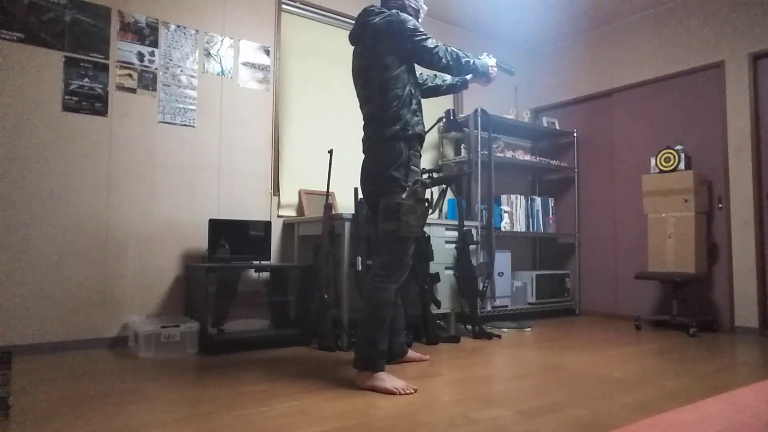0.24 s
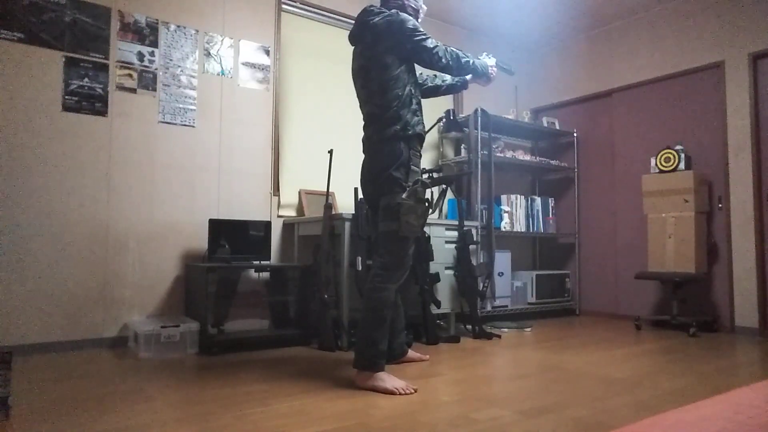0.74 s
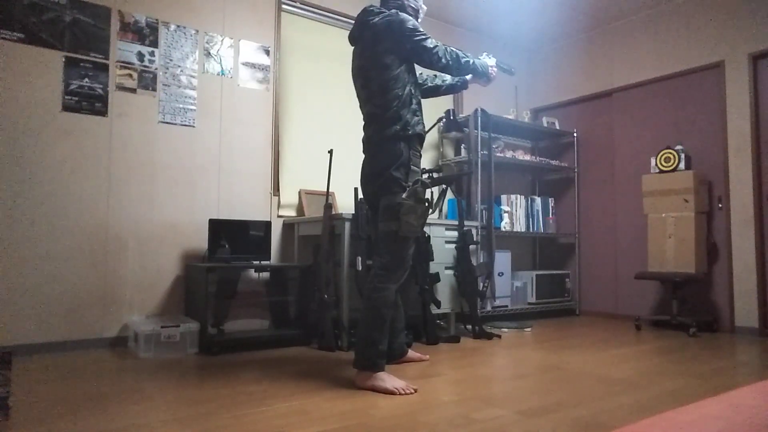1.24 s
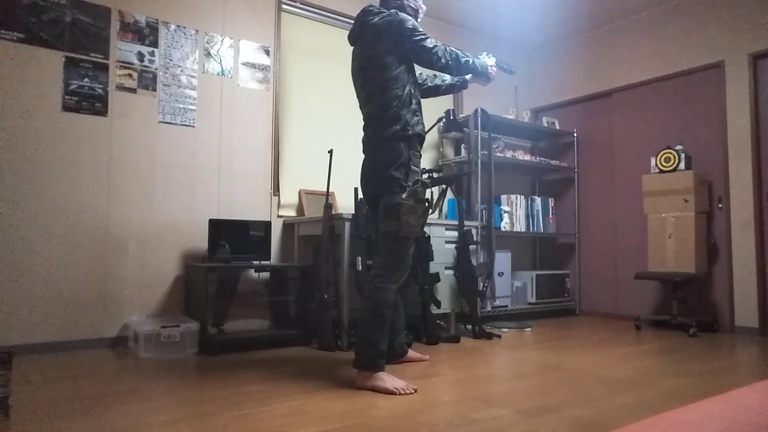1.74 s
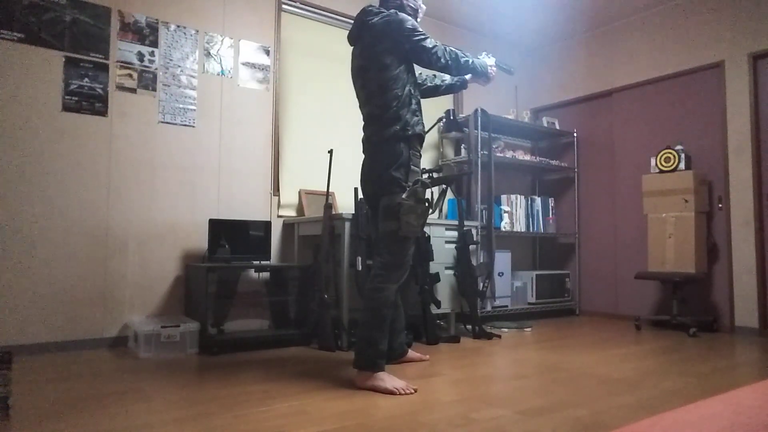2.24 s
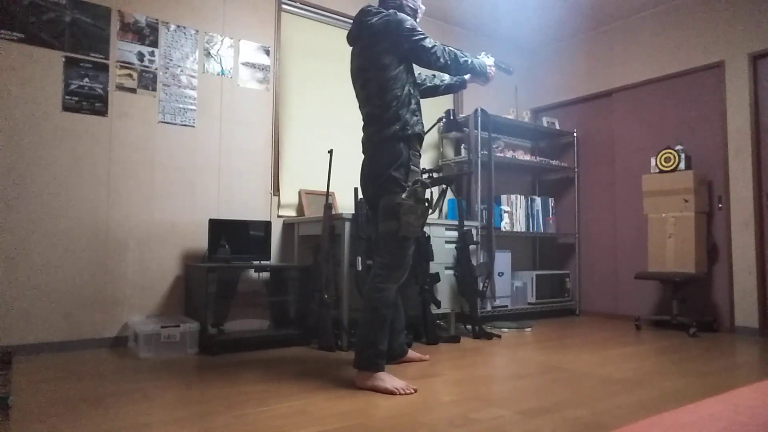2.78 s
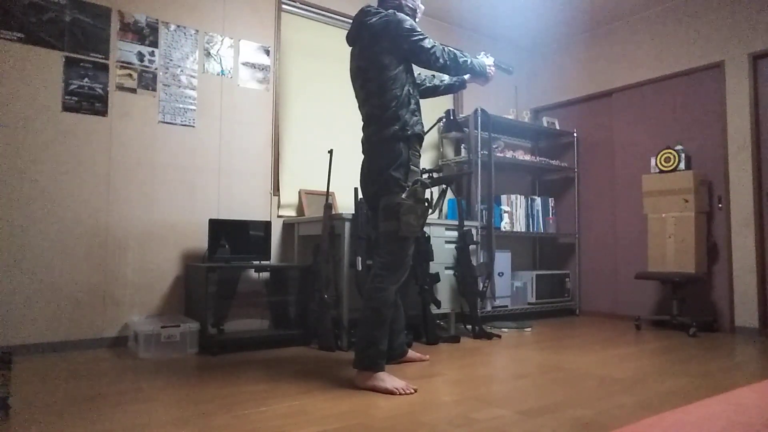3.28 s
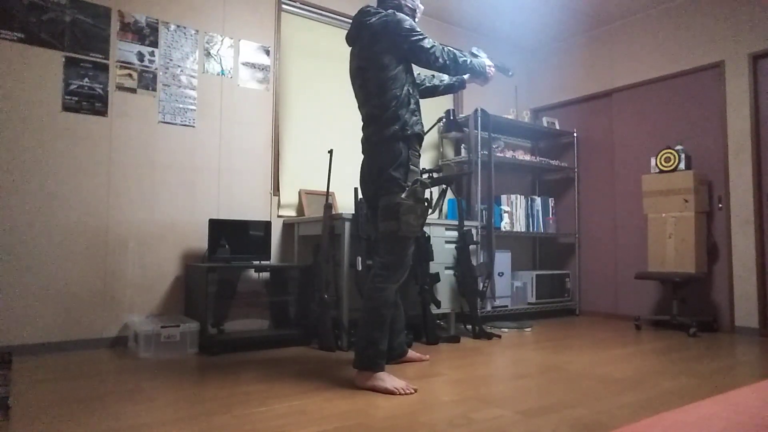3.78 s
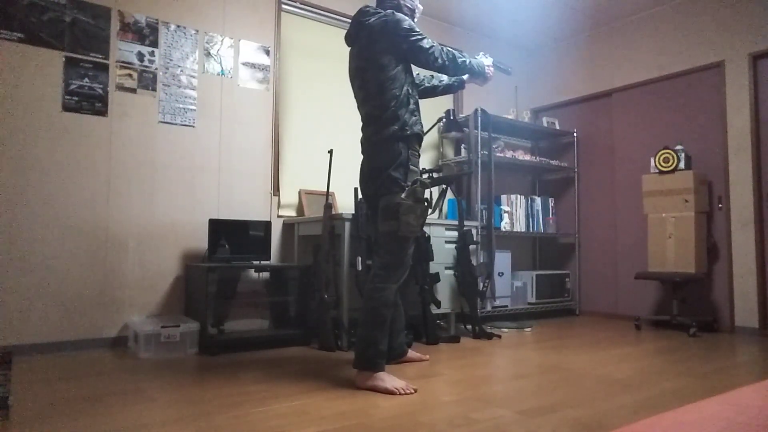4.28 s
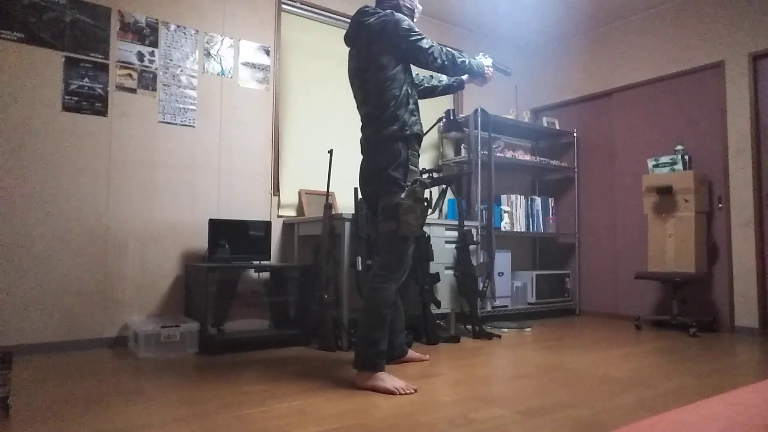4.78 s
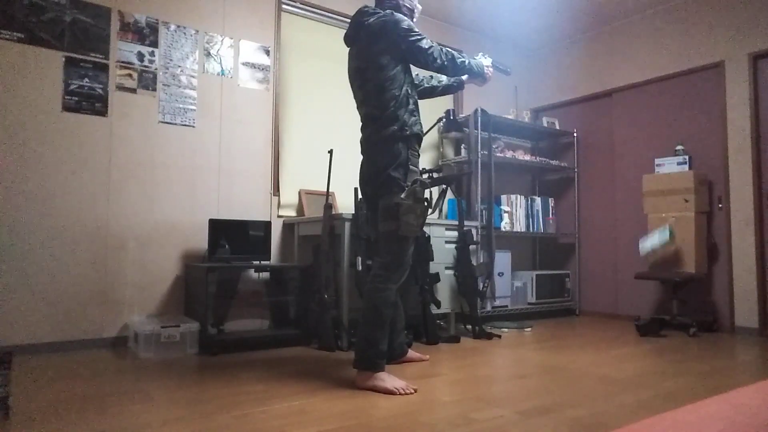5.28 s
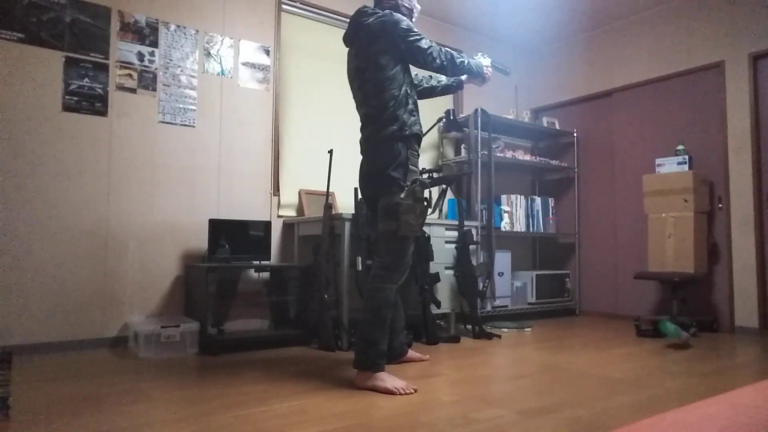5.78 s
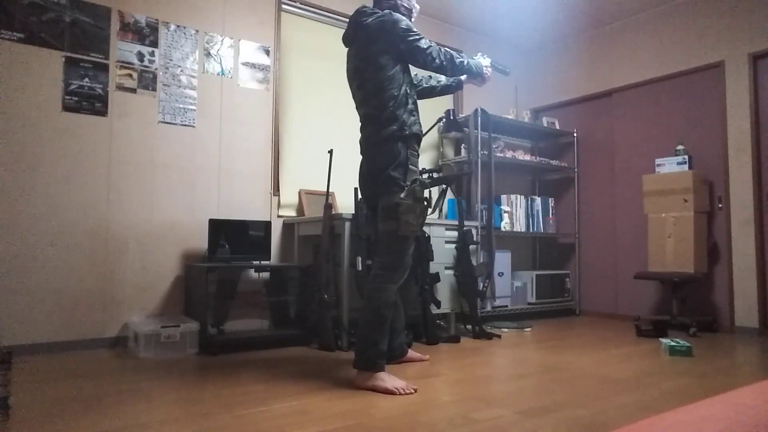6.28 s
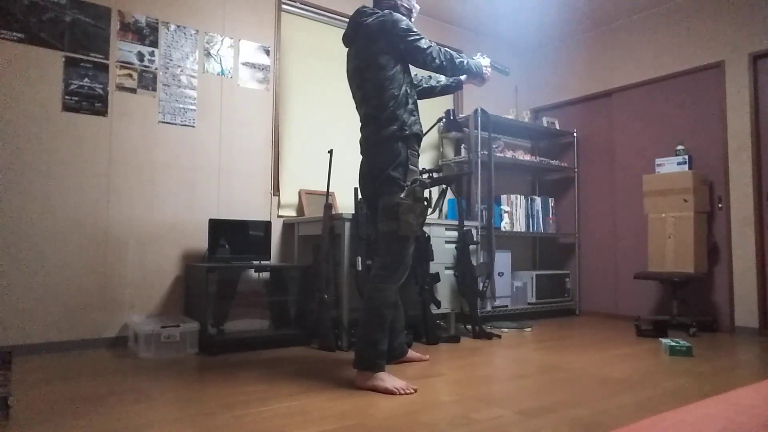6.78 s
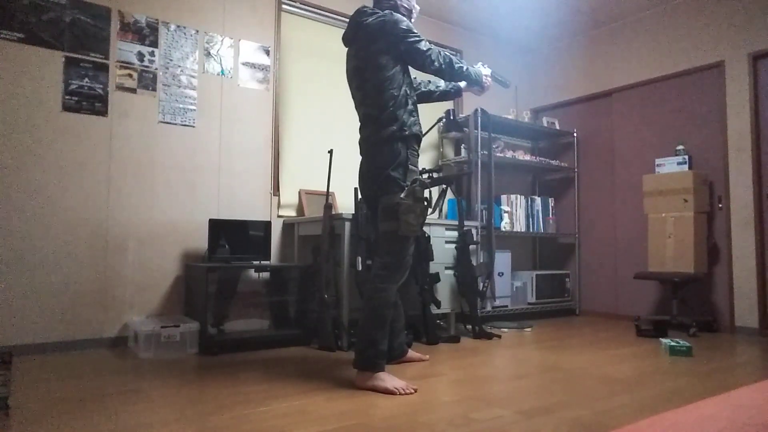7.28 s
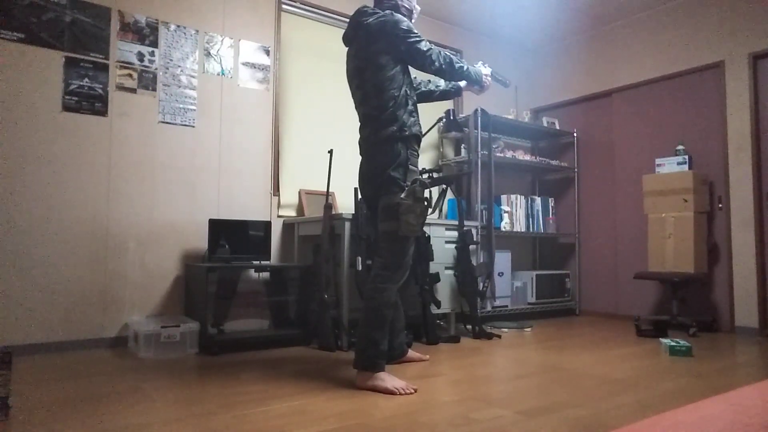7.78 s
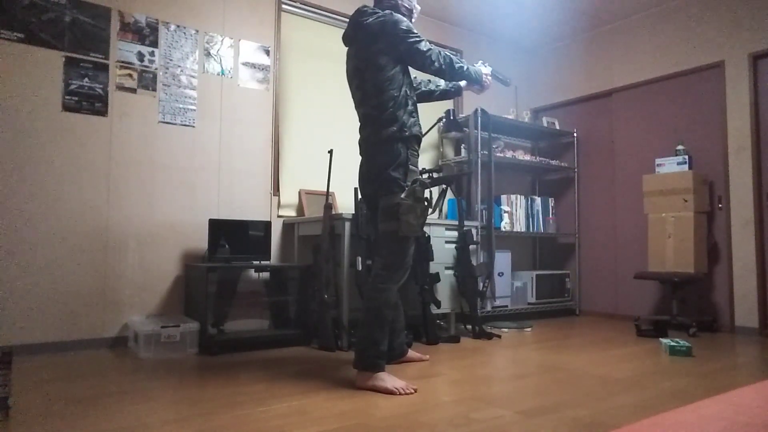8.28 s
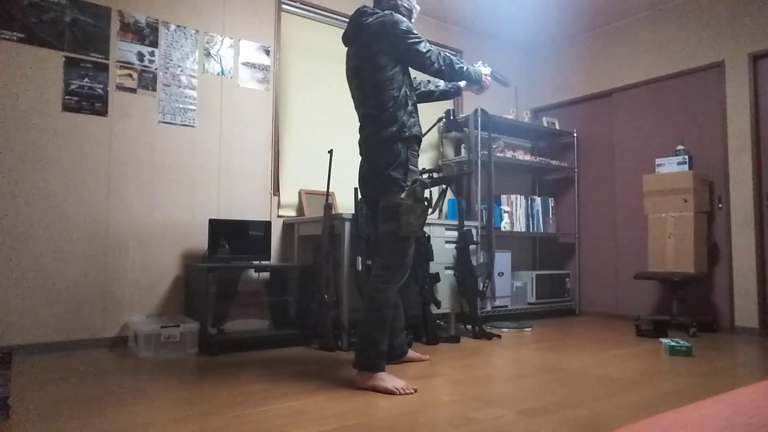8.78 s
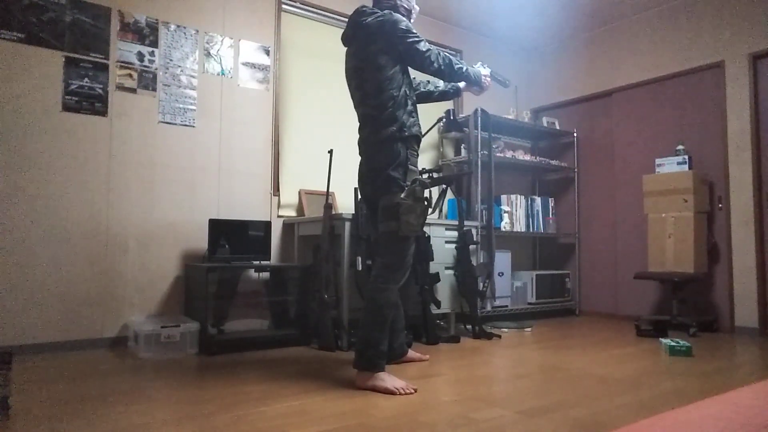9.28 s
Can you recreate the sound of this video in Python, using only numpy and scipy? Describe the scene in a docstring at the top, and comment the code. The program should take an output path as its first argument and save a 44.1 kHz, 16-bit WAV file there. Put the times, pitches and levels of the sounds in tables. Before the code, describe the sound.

A gas toy pistol fires in a small, bare room at about 0.4, 1.6, 2.6 and 3.8 seconds. Each shot is a sharp burst of gas with an immediate slide clack, a low thump and a brief room ring. From 4.4 seconds a target slides, barely audible, then knocks lightly and lands on the wooden floor at 5.2 seconds with a loud, ringing clatter. A small carton tumbles after it in quieter, hollow bounces that die out around 6 seconds. After a pause, two slightly louder shots come at 7.7 and 8.7 seconds, each followed by a rattling knock of cardboard boxes, stronger the first time. Spent pellets tick faintly on the boards around 8.3 seconds and again between 9.1 and 9.5 seconds. The shots sound compressed, and a faint low hum and hiss lie underneath throughout.

```python
"""A gas toy pistol fires six shots at a target on cardboard boxes in a small bare room.
Each shot is a faint lead-in, a gas burst and a slide clack, and excites the room's modes.
The target slides and topples; it and a small carton rattle, ring and thud on the wooden floor.
Spent pellets tick on the boards. The recorder compresses hard, so each shot stays flat at first
while the room dies away; low hum and hiss lie underneath."""
import sys
import numpy as np
from scipy import signal
from scipy.io import wavfile
from scipy.ndimage import uniform_filter1d

SR = 44100
rng = np.random.default_rng(int(sys.argv[2]) if len(sys.argv) > 2 else 0)


def log_audio(samples):
    """Write samples as a 16-bit WAV file to the path given in sys.argv[1]."""
    # one column per channel
    frames = np.atleast_2d(samples).T
    # limit to full scale, then quantise
    limited = np.clip(frames, -1, 1)
    pcm = np.round(limited * 32767).astype(np.int16)
    wavfile.write(sys.argv[1], SR, pcm)


N = 420273

# shots: (time [s], level [dB], treble [dB], thump delay [s])
SHOTS = [(0.434, 21.5, -2, .0096), (1.574, 20, -1.5, .0096), (2.6457, 21.5, -1.5, 0.01),
         (3.8081, 20.5, -1, .0115), (7.666, 27, -1.5, 0.0033), (8.7014, 25, -5, 0.0093)]
# target lands and rocks: (time [s], rattle [dB], treble [dB], board thud [dB], ring [dB])
TARGET_BLOWS = [(5.069, -18, 28, -25, -18.5), (5.09, -33, 2.5, -4.5, -28.5), (5.139, -22.5, 2.5, -13, -30),
                (5.225, 30.5, 16, 16, 11.5), (5.405, -15, 0, -2, -26), (5.442, 3, 10, -9.5, -5)]
# carton tumbles, later pellets jolt the boxes: columns as TARGET_BLOWS
CARTON_BLOWS = [(5.54, -14, 14, -23, -34), (5.621, -6.5, 11, -2, -2), (5.685, -22.5, -5, -12, -8.5),
                (5.829, -35.5, 11.5, -24, -20), (5.88, -14, -1, -14, -15), (5.926, -17, 11.5, -13, -13),
                (5.99, -23, -45, -19, -23), (6.06, -48.5, 29.5, -42, -52), (6.15, -48, 19, -56, -55),
                (7.703, 18.5, 4, 15.5, 13.5), (7.792, 0.5, 24, -36, -4), (7.944, -36, -4, -40, -10),
                (8.789, -6, 4, -2, 2), (8.831, -12, -10.5, -11, -15)]
# pellet tick and bright part of the target's slide: (frequency [Hz], density [dB])
TICK_SPECTRUM = [(100, -20), (300, -5.5), (600, -9.5), (1100, -8.5), (2300, -5.5), (4500, -2.5),
                 (8000, -6.5), (14000, -9)]
EDGES_HZ = 20 * 2 ** np.arange(0, 9.8, .5)
CENTRES_HZ = np.sqrt(EDGES_HZ[:-1] * EDGES_HZ[1:])


def from_db(db):
    """Decibels to gain."""
    return 10 ** (np.asarray(db) / 20)


def per_band(table):
    """Interpolate a table over log frequency at the band centres."""
    hz, values = np.array(table).T
    return np.interp(np.log(CENTRES_HZ), np.log(hz), values)


def add(out, sound, start_s):
    """Mix a sound in at start_s."""
    i = round(start_s * SR)
    out[:, i:i + sound.shape[1]] += sound[:, :N - i]


def noise_bands():
    """Half-octave noise, neighbours uncorrelated: (band, mid/side, sample)."""
    settle = 2000
    white = rng.standard_normal((2, 2, N + settle))
    filters = [signal.butter(2, hz, "band", fs=SR, output="sos") for hz in zip(EDGES_HZ, EDGES_HZ[1:])]
    return np.array([signal.sosfilt(sos, white[k % 2])[:, settle:] for k, sos in enumerate(filters)])


def mix_bands(bands, levels_db):
    """Weighted sum of bands at unit power."""
    x = np.einsum("bcn,b->cn", bands, from_db(levels_db))
    return x / np.sqrt(np.mean(x ** 2) + 1e-20)


def burst(decay_s, clicks_per_s, size=4000):
    """A first blow, then fading random clicks."""
    clicks = rng.standard_normal(size) * (rng.random(size) < clicks_per_s / SR)
    clicks[0] = 0.7
    return clicks * np.exp(-np.arange(size) / SR / decay_s)


def decay(power, t60_s):
    """Stored energy falls 60 dB in t60_s."""
    return signal.lfilter([1], [1, -from_db(-2 * 60 / (t60_s * SR))], power)


def room_hit(noise, spectrum, level_db, treble_db, contact, direct_db, bass_db=0, hollow_db=0,
             tail=SR // 3):
    """Contact energy arrives directly, then fills the room and dies band by band."""
    # reverberation: (frequency [Hz], T60 [s])
    room_t60 = [(40, 0.57), (120, 0.14), (250, 0.19), (500, 0.27), (1000, 0.37), (1600, 0.34), (3000, 0.34),
                (6000, .32), (12000, 0.26)]
    bass_hz, hollow_hz, treble_hz = 257.2, 574, 3740
    build_up_s, late_db, late_stretch = .0018, -32.5, 1.846
    shelves_db = bass_db / (1 + (CENTRES_HZ / bass_hz) ** 2)
    shelves_db += treble_db / (1 + (treble_hz / CENTRES_HZ) ** 2)
    cavity_db = hollow_db * np.exp(-np.log2(CENTRES_HZ / hollow_hz) ** 2)
    base_db = per_band(spectrum)
    base_rms = np.sqrt(np.sum(from_db(base_db) ** 2 * np.diff(EDGES_HZ)) / (SR / 2))
    gains = from_db(level_db + base_db + shelves_db + cavity_db) / base_rms
    power = np.pad(contact ** 2 / np.sum(contact ** 2), (0, tail)) + 1e-30
    direct = from_db(2 * direct_db) * decay(power, t60_s=.0035)
    echoes = decay(power, np.log(1e6) * build_up_s) / (build_up_s * SR)
    envelopes = []
    for hz, gain, t60_s in zip(CENTRES_HZ, gains, per_band(room_t60)):
        late = from_db(2 * late_db) * decay(echoes, late_stretch * t60_s)   # far corners
        envelope = gain * np.sqrt(direct + decay(echoes, t60_s) + late)
        rise = min(5.1 * hz / SR, .25)   # low bands start more slowly
        envelopes.append(signal.lfilter([rise], [1, rise - 1], envelope))
    start = rng.integers(noise.shape[2] - len(power))
    return np.einsum("bcn,bn->cn", noise[..., start:start + len(power)], np.array(envelopes))


def mode(hz, level_db, t60_s, swell_s):
    """A damped mode beating with a close, weaker neighbour; mid only."""
    t = np.arange(round(1.5 * t60_s * SR)) / SR
    envelope = from_db(level_db - 60 * t / t60_s) * (1 - np.exp(-t / swell_s))
    twin = from_db(-8.5) * np.sin(2 * np.pi * hz * rng.normal(1, .015) * t)
    return envelope * (np.sin(2 * np.pi * hz * t) + twin) * [[1], [0]]


def pistol(out, noise):
    """A faint lead-in softens the onset, gas escapes in a dense burst, the slide clacks home."""
    # lead-in, gas, slide: (time after firing [s], level [dB], decay [s])
    cycle = [(-.003, -30.5, .003), (0, 1, 0.005), (0.046, 0, 0.0034)]
    # shot: (frequency [Hz], density [dB])
    spectrum = [(25, -33), (60, -18), (120, -4), (250, -2), (500, -5.5), (1000, -8), (1600, -6), (2500, -2),
                (4000, -4), (8000, -5.5), (14000, -9.5)]
    lead_in_s = cycle[0][0]
    for time_s, level_db, treble_db, _ in SHOTS:
        contact = 0
        for lag_s, db, decay_s in cycle:
            clicks = from_db(db) * burst(decay_s, clicks_per_s=29000)
            contact += np.roll(clicks, round((lag_s - lead_in_s) * SR))
        shot = room_hit(noise, spectrum, level_db, treble_db, contact, direct_db=7.5, tail=2 * SR // 3)
        add(out, shot, time_s + lead_in_s)


def room_modes(out):
    """Each gas burst thumps the lowest room modes and sets higher ones ringing."""
    # low and high modes: (frequency [Hz], relative level [dB], T60 [s])
    thump_modes = [(64.25, -8.5, .13), (104, 1, 0.065), (144, -1, 0.048), (200, -5.5, 0.055)]
    ring_modes = [(569, -22.5, .33), (757, -22, 0.34), (936, -24.5, 0.39), (1052, -23, .4), (1193, -23, .4),
                  (2390, -18.5, 0.3)]
    push_db = 2
    for time_s, level_db, _, lag_s in SHOTS:
        for hz, db, t60_s in thump_modes:
            add(out, mode(hz, level_db + push_db + db, t60_s, swell_s=.004), time_s + lag_s)
        for hz, db, t60_s in ring_modes:
            hz *= rng.normal(1, .01)
            db += rng.normal(0, 2.4)
            add(out, mode(hz, level_db + db, t60_s, swell_s=.02), time_s)


def target_slide(out, noise):
    """The toppling target slides in short, faint swells."""
    # swells: (time [s], length [s], dull level [dB], bright level [dB])
    slides = [(4.444, .13, -59, -70), (4.6, .14, -75.5, -69), (4.764, .12, -71, -78),
              (4.848, 0.32, -83.5, -64)]
    dull_bands = (CENTRES_HZ > 150) & (CENTRES_HZ < 450)
    for time_s, length_s, dull_db, bright_db in slides:
        start, size = round(time_s * SR), round(length_s * SR)
        bands = noise[..., start:start + size]
        dull = from_db(dull_db) * mix_bands(bands[dull_bands], np.zeros(dull_bands.sum()))
        bright = from_db(bright_db) * mix_bands(bands, per_band(TICK_SPECTRUM))
        swell = np.sin(np.pi * np.arange(size) / size)
        add(out, swell * (dull + bright), time_s)


def cardboard_rattle(out, noise):
    """Struck cardboard rattles, deeper on heavy landings; the carton is hollow, the target flat."""
    # rattle: (frequency [Hz], density [dB])
    spectrum = [(25, -12.5), (60, 3.5), (150, 13), (300, 13), (600, 4.5), (1100, -0.5), (1900, -6.5),
                (2800, -14), (4000, -18), (8000, -31.5), (14000, -37)]
    for blows, hollow_db in ((TARGET_BLOWS, -8.5), (CARTON_BLOWS, 4.5)):
        for time_s, level_db, treble_db, thud_db, _ in blows:
            contact = burst(decay_s=.0035, clicks_per_s=480)
            rattle = room_hit(noise, spectrum, level_db, treble_db, contact, direct_db=11,
                              bass_db=.7 * (thud_db - level_db), hollow_db=hollow_db, tail=SR // 2)
            add(out, rattle, time_s)


def knocks(out):
    """Each blow thuds in the floorboards and rings the struck body."""
    # modes of each body: (frequency [Hz], relative level [dB], T60 [s])
    target = [(773, 2.5, 0.16), (1120, -7.5, .1), (1830, 2.5, .08), (2480, 0.5, .03)]
    carton = [(216, -15, 0.06), (291.7, -4, 0.15), (428, -17, 0.22), (644, -12, 0.091)]
    boards = [(66, -6.5, 0.22), (83.6, 0, 0.12), (101.9, -3.5, 0.16), (146, -6, 0.084)]
    for blows, body in ((TARGET_BLOWS, target), (CARTON_BLOWS, carton)):
        for time_s, _, _, thud_db, ring_db in blows:
            for modes, level_db, swell_s in ((boards, thud_db, .016), (body, ring_db, .0084)):
                for hz, db, t60_s in modes:
                    hz *= rng.normal(1, .032)
                    db += rng.normal(0, 2.5)
                    add(out, mode(hz, level_db + db, t60_s, swell_s), time_s)


def pellets(out, noise):
    """Each bounce is a hard tick; the boards carry a duller forerunner."""
    # bounces: (time [s], level [dB], treble [dB], direct sound [dB])
    bounces = [(8.228, -30, 1.5, 0), (8.432, -26.5, 1.5, 16.5), (9.1302, -33, 2, 14), (9.372, -37, 4, 14.5),
               (9.503, -35.5, 2.5, 4), (9.5095, -38, 9, 12)]
    sharpest_db = max(row[-1] for row in bounces)
    lead_s = .0065
    for time_s, level_db, treble_db, direct_db in bounces:
        contact = burst(decay_s=.0015, clicks_per_s=3000)
        add(out, room_hit(noise, TICK_SPECTRUM, level_db, treble_db, contact, direct_db), time_s)
        lead_db = level_db - 5 + 2 * (direct_db - sharpest_db)
        contact = burst(decay_s=.003, clicks_per_s=3000)
        lead = room_hit(noise, TICK_SPECTRUM, lead_db, treble_db=-8, contact=contact, direct_db=3)
        add(out, lead, time_s - lead_s)


def left_right(mid_side):
    """Mid/side to stereo; side is kept only in the treble."""
    mid, side = mid_side
    side = from_db(-4.5) * signal.sosfilt(signal.butter(8, 6600, "high", fs=SR, output="sos"), side)
    return np.array([mid + side, mid - side])


def microphone(x):
    """Rumble cut, then broad room bumps near 1 and 2.5 kHz and the peaks and dip of the sound port."""
    # room bumps (first two), port and housing: (frequency [Hz], width [Hz], gain [dB])
    resonances = [(940, 150, 4), (2540, 350, 3), (5720, 1300, 9), (7250, 2100, -7.5), (11180, 1700, 13)]
    x = signal.sosfilt(signal.butter(2, 30, "high", fs=SR, output="sos"), x)
    for hz, width_hz, db in resonances:
        a, w, cos = from_db(db / 2), np.tan(np.pi * width_hz / SR), np.cos(2 * np.pi * hz / SR)
        x = signal.lfilter([1 + w * a, -2 * cos, 1 - w * a], [1 + w / a, -2 * cos, 1 - w / a], x)
    return x


def recorder_noise():
    """Wavering low hum and steady hiss."""
    # noise floor: (frequency [Hz], density [dB])
    spectrum = [(25, -23.5), (50, -9.5), (80, -5), (110, -16), (160, -21.5), (300, -27.5), (1200, -33),
                (4000, -41), (7500, -56), (13000, -42)]
    hum_db, hiss_db, waver_db, waver_per_s = -57, -67.5, 1.5, .99
    bands, levels_db, low = noise_bands(), per_band(spectrum), CENTRES_HZ < 160
    hum = mix_bands(bands[low], levels_db[low])
    hiss = mix_bands(bands[~low], levels_db[~low])
    waver = np.interp(np.arange(N) / SR * waver_per_s, np.arange(64), rng.standard_normal(64))
    return left_right(from_db(hum_db + waver_db * waver) * hum + from_db(hiss_db) * hiss)


def scene():
    """All sources, mixed as mid/side, returned as stereo."""
    noise = noise_bands()
    mix = 1e-7 * noise.sum(axis=0)   # never quite silent
    pistol(mix, noise)
    room_modes(mix)
    target_slide(mix, noise)
    cardboard_rattle(mix, noise)
    knocks(mix)
    pellets(mix, noise)
    return left_right(mix)


def record(dry):
    """Microphone, compressor with ceiling, noise floor, clipping, low-pass."""
    knee_db, ratio, ceiling_db = -24.5, 2.43, -9
    attack_s, release_db_per_s, cutoff_hz = .006, 307.5, 14650
    x = microphone(dry)
    power = uniform_filter1d(np.mean(x ** 2, axis=0), size=round(attack_s * SR) + 1)
    release_db = release_db_per_s * np.arange(N) / SR
    level_db = np.maximum.accumulate(10 * np.log10(np.abs(power) + 1e-12) + release_db) - release_db
    compressed_db = np.minimum(level_db, knee_db + (level_db - knee_db) / ratio)
    gain_db = uniform_filter1d(np.minimum(compressed_db, ceiling_db) - level_db, size=65)
    clipped = np.clip(x * from_db(gain_db) + recorder_noise(), -.95, .95)
    lowpass = signal.cheby2(18, 50, cutoff_hz, fs=SR, output="sos")
    return np.clip(signal.sosfilt(lowpass, clipped), -1, 1)


dry = scene()
out = record(dry)
log_audio(out)
```